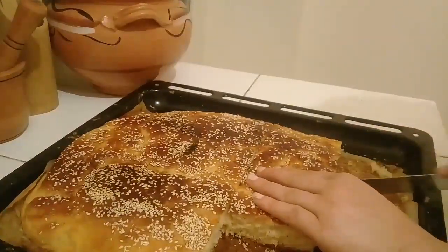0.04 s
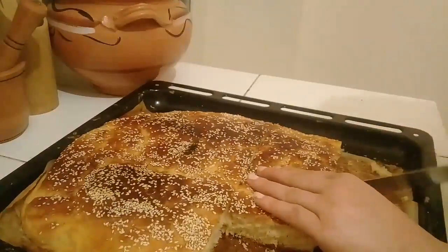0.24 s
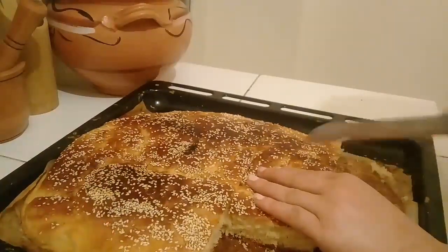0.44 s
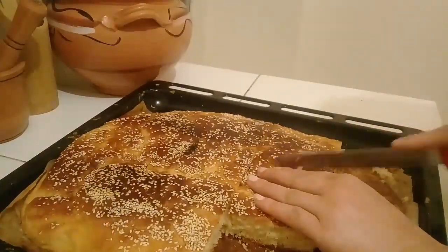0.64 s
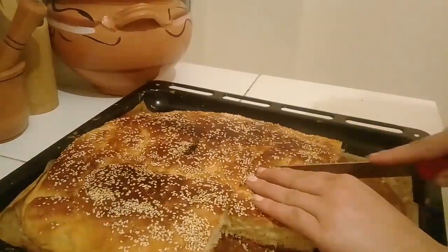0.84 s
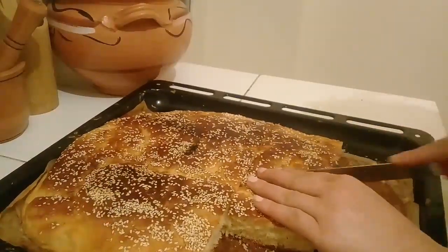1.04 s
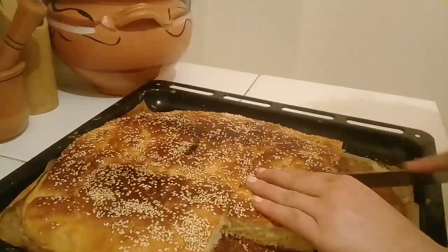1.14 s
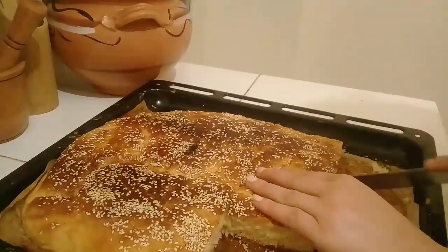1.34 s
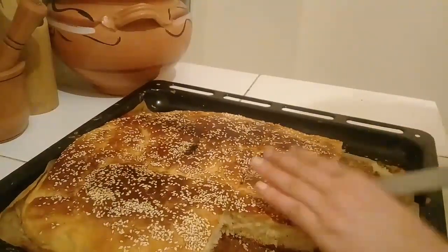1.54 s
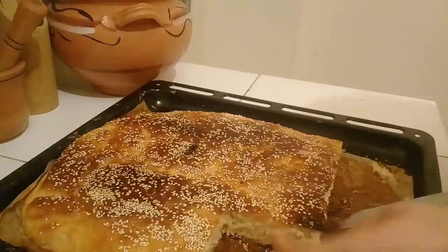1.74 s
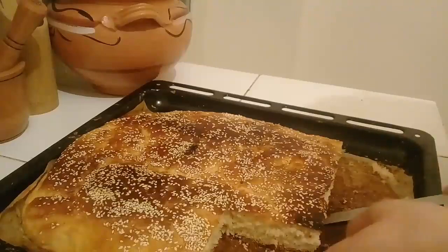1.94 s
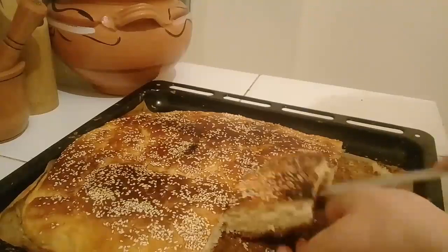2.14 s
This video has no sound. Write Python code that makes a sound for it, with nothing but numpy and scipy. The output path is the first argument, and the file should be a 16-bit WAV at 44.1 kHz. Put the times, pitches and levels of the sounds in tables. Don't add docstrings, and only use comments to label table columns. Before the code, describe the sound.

A knife saws through crusty bread in a metal baking tray: faint scrapes, one hard blade knock ringing away, a pause, then squeaky scraping, crust snaps and small crumbs; close phone microphone in a tiled kitchen.

```python
import sys
import numpy as np
from scipy import signal
from scipy.fft import rfft, irfft
from scipy.io import wavfile
from scipy.ndimage import uniform_filter1d

SR = 44100
rng = np.random.default_rng(int(sys.argv[2]) if len(sys.argv) > 2 else 0)


def gain_from_db(level_db):
    decades = np.asarray(level_db, float) / 20
    return 10 ** decades


def output_pcm(signal):
    pcm = np.clip(np.atleast_2d(signal).T, -1, 1) * 32767
    wavfile.write(sys.argv[1], SR, np.round(pcm).astype(np.int16))


N = 97020


def evened(x):
    return x / np.sqrt(np.mean(x ** 2) + 1e-20)


def smooth(x, size):
    return uniform_filter1d(uniform_filter1d(x, size), size)


def read(points, hz):
    f, value = np.transpose(points)
    return np.interp(np.log(hz + 1), np.log(f + 1), value)


def colour(x, points):
    gain = gain_from_db(read(points, np.fft.rfftfreq(len(x), 1 / SR)))
    return irfft(rfft(x) * gain, len(x))


def add(mix, start_s, sound):
    part = mix[round(start_s * SR):][:len(sound)]
    part += sound[:len(part)]


def resonate(x, hz, width_hz):
    turn = np.exp(2j * np.pi * np.cumsum(hz * np.ones(len(x))) / SR)
    r = np.exp(-np.pi * width_hz / SR)
    still = signal.lfilter([1 - r], [1, -r], x / turn + 1e-18)
    return 2 * (turn * still).real


def steep_resonance(x, hz, width_hz):
    return resonate(resonate(x, hz, width_hz * 3), hz, width_hz)


def ring(hz, t60_s, t):
    return gain_from_db(-60 * t / t60_s) * np.sin(2 * np.pi * hz * t)


def clicks(per_s, spread_db):
    chance, size, sign = rng.random(N), rng.exponential(1, N), rng.standard_normal(N)
    return sign * gain_from_db(spread_db * np.minimum(size, 4)) * (chance < per_s / SR)


def tick(t, top_hz):
    burst = 0.3 * rng.standard_normal(len(t)) * gain_from_db(-60 * t / 0.006)
    burst[0] += 1
    return signal.lfilter(*signal.butter(2, [1500, min(top_hz, 18000)], "band", fs=SR), burst)


def stroke(length_s, rise):
    u = np.arange(0, length_s, 1 / SR) / length_s
    return np.sin(np.pi / 2 * np.minimum(u / rise, (1 - u) / (1 - rise)))


def without_bass(x):
    return signal.sosfilt(signal.butter(4, 970, "high", fs=SR, output="sos"), x)


# start_s, level_db (peak), tick_db, pitch_factor, upper_modes_db
KNOCKS = [
    (0.072, -54.5, 22, 0.96, 0),
    (0.2222, -6.5, -10, 0.99, 3.5),
    (1.3128, -60, 16, 1.0, -5),
]
# pitch_hz, t60_s, level_db
BLADE_MODES = [(1196, 0.05, -19.5), (1538, 0.012, -2.5), (2850, 0.011, -3), (3220, 0.011, -2.5),
               (4313, 0.0085, -8), (2060, .014, -8), (3720, 0.006, -4.5), (2390, 0.0062, -4.5),
               (5096, 0.0066, -20)]


def knocks():
    out, t = np.zeros(N), np.arange(4000) / SR
    rise_cycles, tick_lag_samples = 4.0, 40
    for start_s, level_db, tick_db, pitch, upper_db in KNOCKS:
        body = np.zeros(len(t))
        for hz, t60_s, mode_db in BLADE_MODES:
            swell = np.minimum(t * hz / rise_cycles, 1) ** 2
            body += gain_from_db(mode_db + upper_db * (hz > 2500)) * ring(hz * pitch, t60_s, t) * swell
        click = np.roll(tick(t, 11000), tick_lag_samples)
        add(out, start_s, gain_from_db(level_db) * (body + gain_from_db(tick_db) * click))
    return without_bass(out)


# start_s, length_s, level_db, pitch_hz, upper_resonances_db
SCRAPES = [(0.0, 0.05, -72.5, 1580, 13), (0.0, 0.06, -72.5, 2290, -16), (0.055, 0.06, -62.5, 2280, -12),
           (0.094, 0.034, -51, 1536, 1.5), (0.131, 0.062, -57.5, 1478, -13),
           (0.174, 0.025, -48.5, 1566, -3), (1.17, 0.16, -70.5, 1710, -26), (1.261, 0.14, -61, 1744, -5.5),
           (1.326, 0.082, -54.5, 1696, 1), (1.428, 0.059, -58.5, 1660, 0),
           (1.506, 0.051, -53.5, 1597, -1.5), (1.537, 0.039, -42.5, 1540, 3),
           (1.562, 0.042, -43.5, 1446, -9.5), (1.566, 0.058, -45.5, 1295, -17),
           (1.56, 0.075, -50.5, 2100, -10), (1.595, 0.043, -49, 1493, -7), (1.648, 0.076, -57.5, 1435, 0),
           (1.791, 0.027, -63.5, 1590, 2), (1.82, 0.018, -58.5, 1505, -17), (1.578, 0.08, -51, 2777, -13)]
# pitch_ratio, width_hz, level_db
CONTACT_TONES = [(1.0, 170.3, 9), (1.38, 201.4, -5)]
# pitch_hz, width_hz, level_db, lean (share of the pitch-dependent gain)
RUBBED_BLADE = [(2860, 130, 4, -1), (3190, 150, 2, 1), (4350, 320, -11, 0), (2550, 250, -11, 0),
                (9800, 300, -27, 0)]


def scrapes():
    out, slips = np.zeros(N), clicks(per_s=7000, spread_db=1.8)
    sag_per_s, wander_depth = 1.1, 0.02
    wander = evened(smooth(rng.standard_normal(N + 800), 300))
    patches = rng.integers(0, N // 2, len(SCRAPES))
    for at, (start_s, length_s, level_db, top_hz, upper_db) in zip(patches, SCRAPES):
        press = stroke(length_s, rise=0.22)
        drive = np.r_[slips[at:][:len(press)] * press, np.zeros(800)]
        hz = top_hz * (1 - sag_per_s * np.minimum(np.arange(len(drive)) / SR, length_s))
        hz = hz * (1 + wander_depth * wander[round(start_s * SR):][:len(hz)])
        lean_db = np.clip(2 * (top_hz - 1590), -5, 5)
        contact = sum(gain_from_db(db) * steep_resonance(drive, hz * ratio, width_hz)
                      for ratio, width_hz, db in CONTACT_TONES)
        blade = sum(gain_from_db(db + lean * lean_db) * steep_resonance(drive, mode_hz, width_hz)
                    for mode_hz, width_hz, db, lean in RUBBED_BLADE)
        add(out, start_s, gain_from_db(level_db) * evened(contact + gain_from_db(upper_db) * blade))
    return without_bass(out)


def flakes():
    train, kind = clicks(per_s=900, spread_db=2.5), rng.integers(0, 12, N)
    t, cycles = np.arange(600) / SR, 5.0
    out = np.zeros(N)
    for k, hz in enumerate(np.geomspace(2000, 7000, num=12)):
        out += signal.oaconvolve(train * (kind == k), ring(hz, 2 * cycles / hz, t))[:N]
    return evened(out)


# start_s, length_s, level_db, treble_db, hiss_centre_hz
CRUNCHES = [(0.0, 0.042, -66, 7, 9000), (0.06, 0.1, -58, 6, 11800), (0.213, 0.085, -48, 7.5, 9700),
            (1.023, 0.068, -65.5, 2.5, 11990), (1.08, 0.047, -74.5, 7, 10050),
            (1.183, 0.089, -70, 3, 11070), (1.257, 0.083, -66, -1, 10800), (1.309, 0.09, -56.5, 5, 13100),
            (1.517, 0.17, -51.5, -5, 9500), (1.84, 0.06, -60, 3, 10500), (1.888, 0.066, -60.5, -3, 10700),
            (1.992, 0.045, -75, 15, 8900), (2.025, 0.063, -68.5, 8, 9960), (2.082, 0.1, -68, 7.5, 9500)]
# pitch_hz, level_db
CRUST_TONE = [(400, 0.5), (1000, 3), (2500, 9), (4500, 3.5), (6500, -9.5), (10000, -4.5), (13000, -15),
              (16000, -12.5)]


def crunch():
    out, crumbs = np.zeros(N), evened(colour(clicks(per_s=5100, spread_db=1), CRUST_TONE))
    high = colour(crumbs, [(5000, -30), (7000, 0)])
    chips = gain_from_db(-8) * flakes()
    for start_s, length_s, level_db, treble_db, hiss_hz in CRUNCHES:
        press = stroke(length_s, rise=0.16)
        at = slice(round(start_s * SR), round(start_s * SR) + len(press))
        hiss = gain_from_db(-19) * evened(resonate(high[at], hiss_hz, 400))
        treble = (gain_from_db(treble_db) - 1) * high[at]
        add(out, start_s, gain_from_db(level_db) * press * (crumbs[at] + chips[at] + treble + hiss))
    return out


# start_s, level_db (peak), pitch_hz, t60_s, tick_db
SNAPS = [(0.0728, -39, 3720, 0.014, 8.5), (.071, -39, 2280, 0.013, -27), (.072, -39, 2850, 0.015, -27),
         (0.1067, -41.5, 2830, 0.049, -24), (0.189, -35.5, 2835, 0.048, -16),
         (0.2006, -41.5, 3010, 0.024, -9.5), (1.0336, -64, 3400, 0.018, -2),
         (1.277, -59.5, 3190, 0.049, -20), (1.3132, -36, 4153, 0.013, -18), (1.315, -42, 1730, 0.023, -31),
         (1.322, -48.5, 4180, 0.064, -32), (1.35, -55, 4500, 0.012, -11), (1.5404, -50, 2870, 0.033, -24),
         (1.7219, -28.5, 1573, 0.014, -27), (1.7237, -44, 4220, 0.022, -10),
         (1.7424, -25.5, 1694, 0.015, -20.5), (1.7500, -21, 1870, 0.0072, -32.5),
         (1.7535, -31.5, 1510, 0.021, -29), (1.772, -38, 1444, 0.017, -25), (1.836, -51, 5000, 0.0076, 0),
         (1.864, -53, 4815, 0.027, -2), (1.878, -56, 3400, 0.019, -3), (1.845, -53, 4460, 0.022, -8),
         (1.903, -56, 3010, 0.015, -6), (1.907, -53, 5340, .015, -10), (1.924, -49, 5000, 0.018, -4),
         (1.936, -56, 5700, .02, -17), (1.947, -49.5, 3190, 0.037, -25), (2.049, -53, 4340, 0.036, -14),
         (2.063, -57.5, 5330, 0.013, 5), (2.094, -58, 2993, 0.074, -14), (2.1, -54, 2690, .03, -8),
         (2.126, -59, 2330, .04, -23), (2.137, -55.5, 4600, 0.042, -20), (2.148, -54, 4200, .02, -5)]


def snaps():
    out, t = np.zeros(N), np.arange(2000) / SR
    rise_cycles = 1.9
    for start_s, level_db, hz, t60_s, tick_db in SNAPS:
        grit = evened(resonate(rng.standard_normal(len(t)), hz, 0.25 * hz)) * gain_from_db(-60 * t / t60_s)
        roughness = np.clip((hz - 1500) / 4500, 0, 1)
        body = (1 - roughness) * ring(hz, t60_s, t) + roughness * grit
        body = body * np.minimum(t * hz / rise_cycles, 1) ** 2
        add(out, start_s, gain_from_db(level_db + 0.5) * (body + gain_from_db(tick_db + 4.0) * tick(t, 7980)))
    return out


# start_s, level_db, pitch_hz, t60_s
BUMPS = [(0.126, -62, 400, 0.16), (0.227, -47, 377, 0.42), (0.225, -48.5, 555, 0.22),
         (1.028, -56, 343.4, 0.53), (1.03, -66, 950, 0.27), (1.3, -67.5, 950, .4), (1.4, -67, 950, 0.25),
         (1.28, -63.5, 620, 0.59), (1.42, -62.5, 550, 0.31), (1.316, -61.5, 405, 0.16),
         (1.561, -55.5, 525, 1), (1.743, -56, 487, .08), (1.82, -62, 336, 0.15), (1.8, -57, 338.8, 0.26),
         (1.95, -71, 782, 0.049), (1.945, -66.5, 660, .2), (1.965, -62.5, 480, 0.27),
         (1.97, -59, 296, 0.56), (2.033, -54.5, 122, 0.25), (2.074, -63.5, 193, 0.4),
         (2.11, -53.5, 117, 0.26), (2.05, -71, 430, 0.45), (1.5, -60, 110, .3), (2.13, -62.5, 190, 0.18),
         (2.07, -64, 290, 0.33), (2.0, -62.5, 205, 0.46)]


def bumps():
    out, t = np.zeros(N), np.arange(SR // 4) / SR
    for start_s, level_db, hz, t60_s in BUMPS:
        push = rng.standard_normal(len(t)) * gain_from_db(-60 * t / t60_s) * np.minimum(t / 0.0038, 1)
        rough = evened(resonate(resonate(push, hz, 0.77 * hz), hz, 0.35 * hz))
        clear = evened(ring(hz, t60_s, t) * np.minimum(t / 0.0075, 1))
        clear_db = -5 - np.log2(hz / 350)
        add(out, start_s, gain_from_db(level_db - 12.5) * (rough + gain_from_db(clear_db) * clear))
    return out


# pitch_hz, level_db, t60_s
TRAY_MODES = [(1162, 2.5, 0.3), (1294, -5, 0.6), (1369, -2, 0.36), (1478, -2, 0.4), (2046, -4.5, .4),
              (2821, -8.5, 0.34), (2906, -10, .5), (3240, -10.5, 0.35)]
# pitch_hz, t60_s
ROOM_DECAY = [(250, 1), (660, 0.8), (1740, 0.71), (4590, 0.55), (12100, 0.51)]
# delay_s, level_db
ECHOES = [(.0026, -12.5), (.0065, -16), (0.019, -19), (0.025, -17), (0.0354, -12.5), (0.038, -15)]


def space(x):
    t = np.arange(SR) / SR
    tray_db, room_db, build_s = -11, -2.5, 0.015
    build = 1 - np.exp(-(t / build_s) ** 2)
    tray = sum(gain_from_db(db) * ring(hz, np.clip(t60_s, 0.1, 0.75), t) for hz, db, t60_s in TRAY_MODES)
    hz, frame_s, z = signal.stft(rng.standard_normal(SR), SR, nperseg=256)
    decay = gain_from_db(-60 * frame_s / read(ROOM_DECAY, hz)[:, None])
    tail = signal.istft(z * decay, SR, nperseg=256)[1][:SR]
    reply = build * gain_from_db(room_db) * tail / np.linalg.norm(tail * build)
    for delay_s, level_db in ECHOES:
        add(reply, delay_s, gain_from_db([level_db]))
    reply = reply + build * gain_from_db(tray_db) * tray / np.linalg.norm(tray)
    return signal.fftconvolve(x, reply)[:N]


# pitch_hz, level_db, waver_db
HUM = [(98.4, -66, 1.3), (352, -81, 2.5), (488, -72, 1.5)]
# pitch_hz, level_db (per Hz)
AIR_TONE = [(25, -18), (70, 6), (130, 5.5), (253, -2.5), (482, -4), (804, -7.5), (1490, -17), (15500, -25)]


def kitchen():
    t = np.arange(N) / SR
    out = gain_from_db(-69.5) * evened(colour(rng.standard_normal(N), AIR_TONE))
    for hz, level_db, waver_db in HUM:
        level, drift = (evened(smooth(noise, 2500)) for noise in rng.standard_normal((2, N)))
        tone = np.sin(2 * np.pi * hz * t + 0.44 * drift)
        out = out + np.sqrt(2) * gain_from_db(level_db + waver_db * level) * tone
    return out


def scene():
    blows, rub, near, crust, low = knocks(), scrapes(), snaps(), crunch(), bumps()
    sent = blows + gain_from_db(-5) * rub + gain_from_db(-5.5) * near + gain_from_db(-1) * crust + gain_from_db(-4) * low
    return (blows + rub + near + crust + low + space(sent) + kitchen())[None]


def roll_off(x):
    return signal.sosfilt(signal.butter(12, 16500, fs=SR, output="sos"), x)


def record(dry):
    edge = signal.firwin(511, 15600, window=("kaiser", 7), fs=SR)
    mix = signal.oaconvolve(dry, edge[None], "same")
    return roll_off(mix)


dry = scene()
out = record(dry)
output_pcm(out)
```